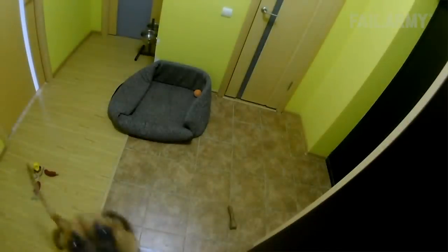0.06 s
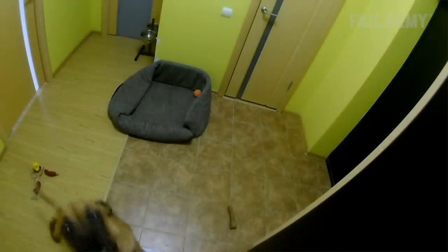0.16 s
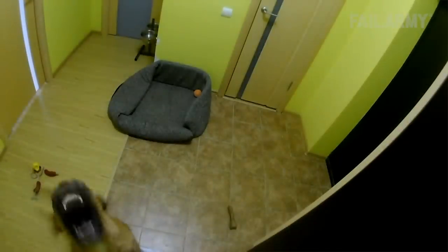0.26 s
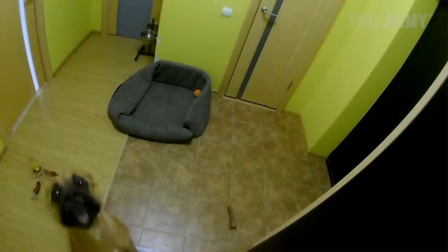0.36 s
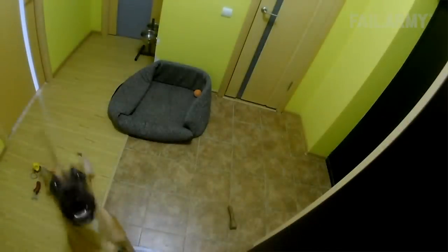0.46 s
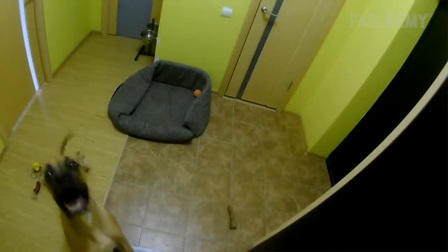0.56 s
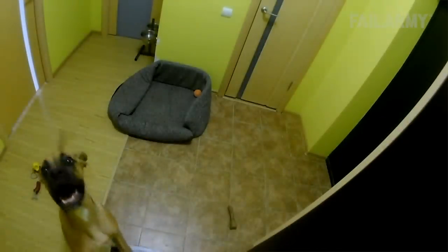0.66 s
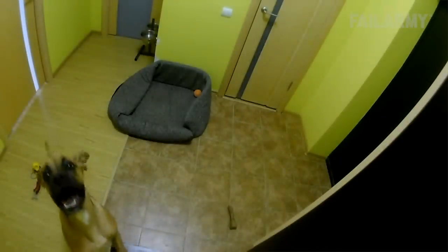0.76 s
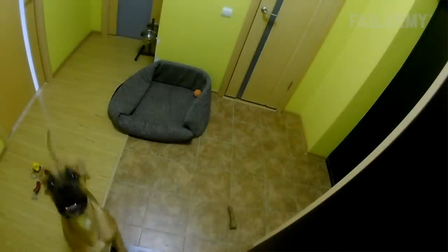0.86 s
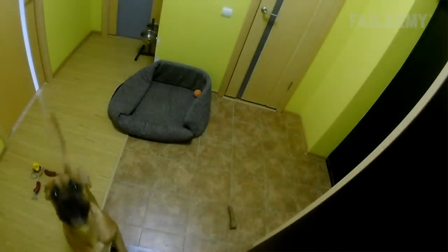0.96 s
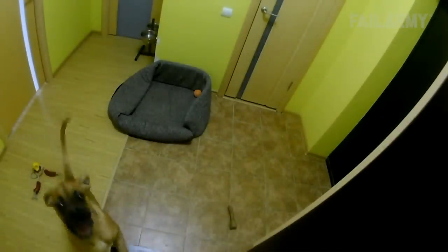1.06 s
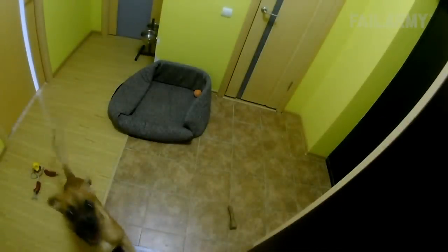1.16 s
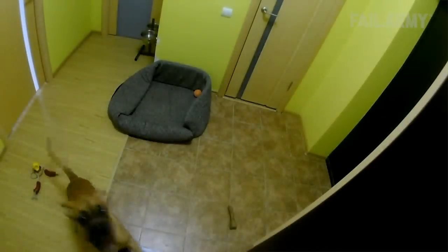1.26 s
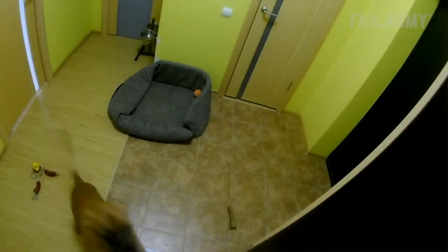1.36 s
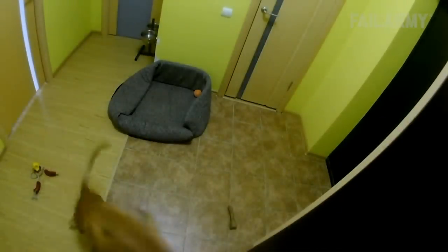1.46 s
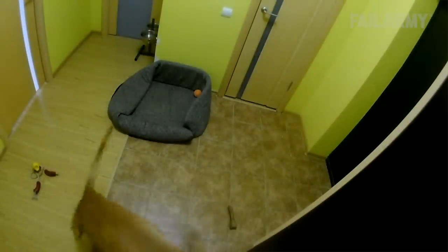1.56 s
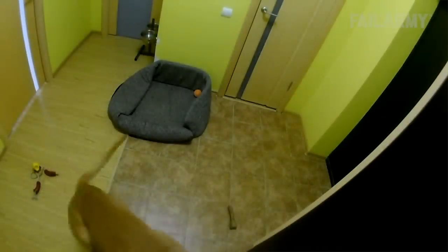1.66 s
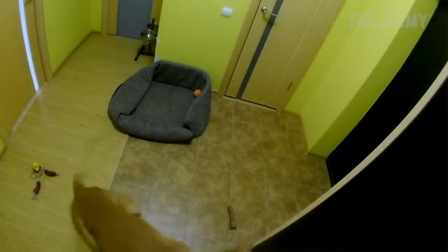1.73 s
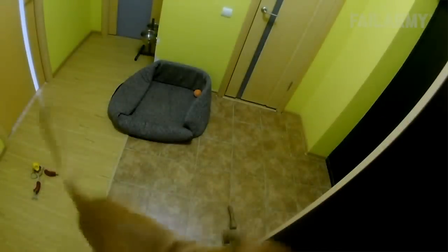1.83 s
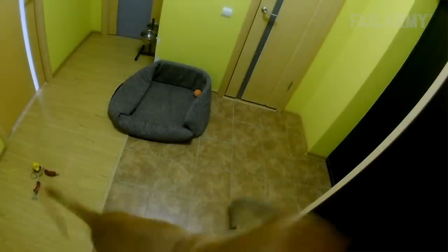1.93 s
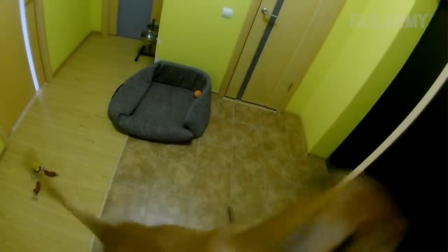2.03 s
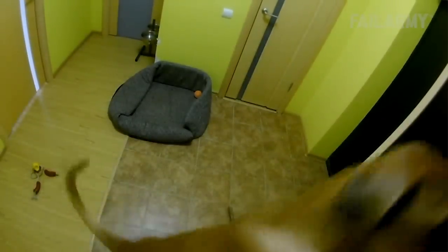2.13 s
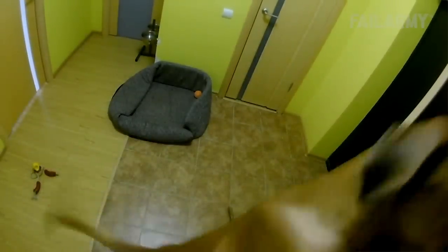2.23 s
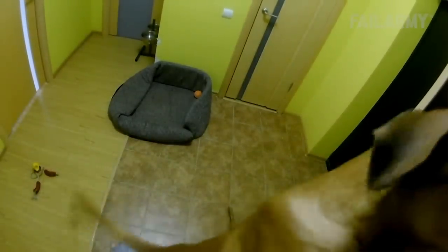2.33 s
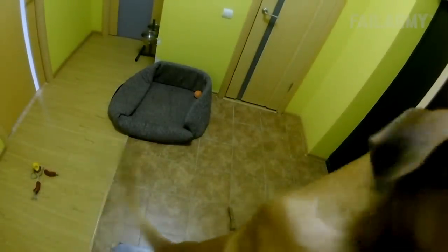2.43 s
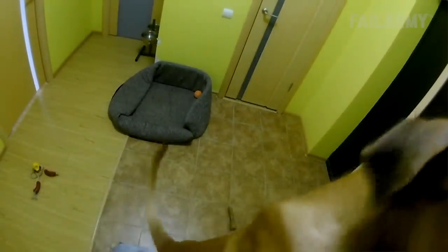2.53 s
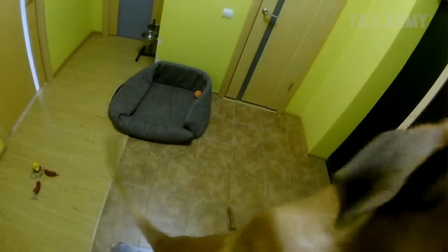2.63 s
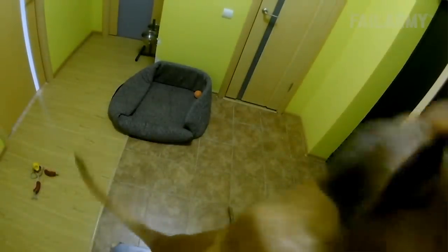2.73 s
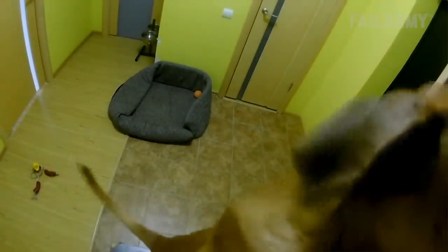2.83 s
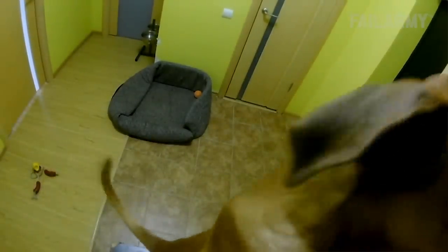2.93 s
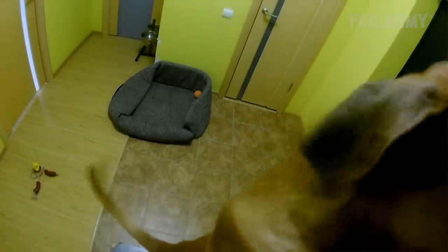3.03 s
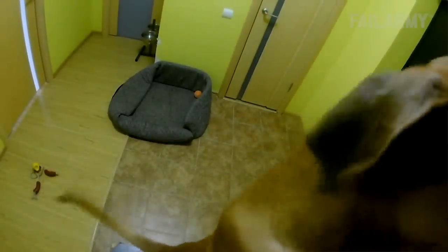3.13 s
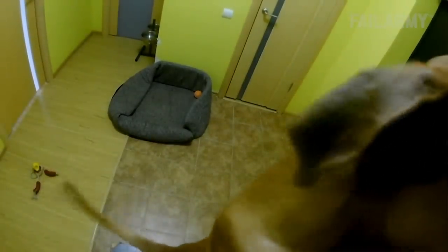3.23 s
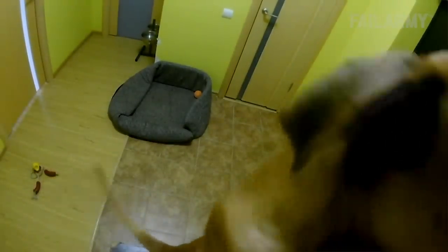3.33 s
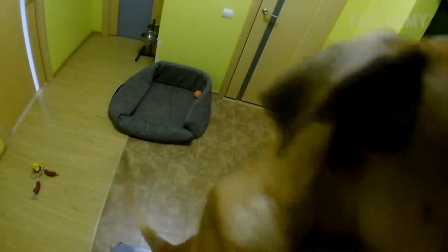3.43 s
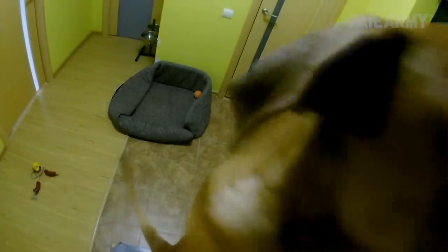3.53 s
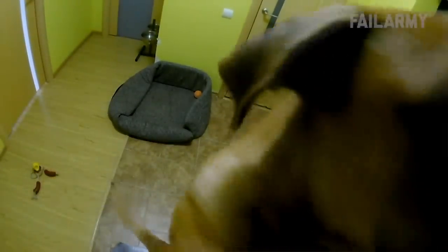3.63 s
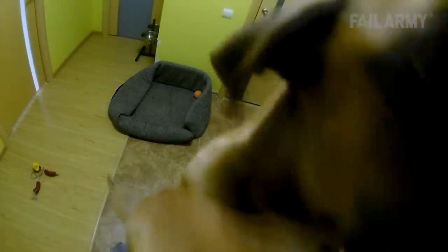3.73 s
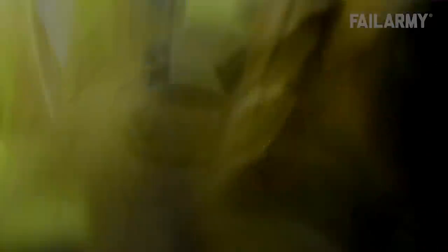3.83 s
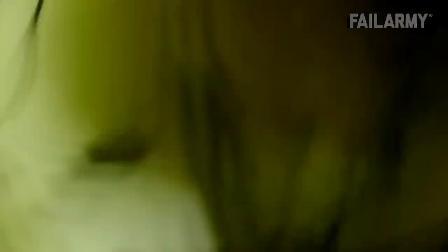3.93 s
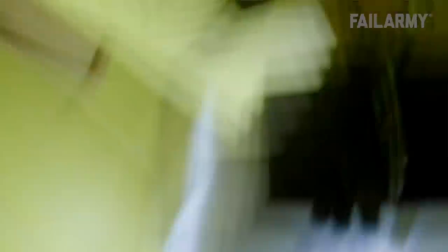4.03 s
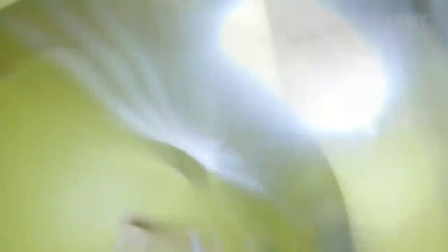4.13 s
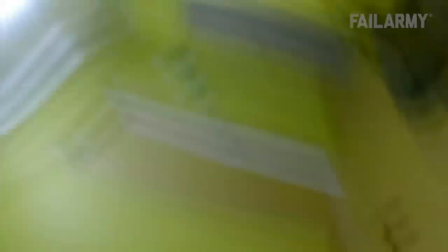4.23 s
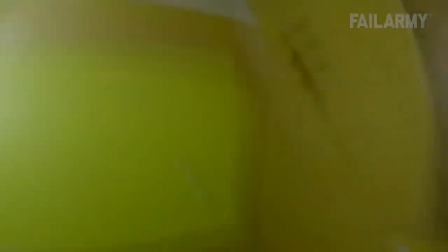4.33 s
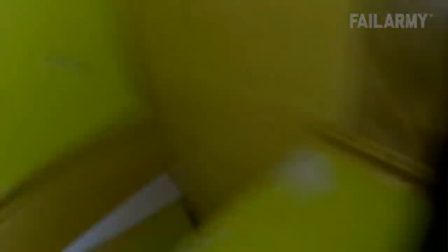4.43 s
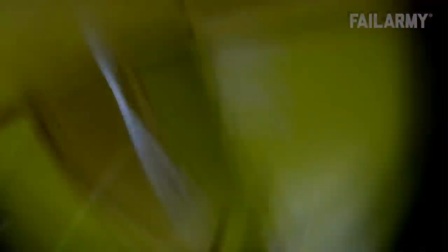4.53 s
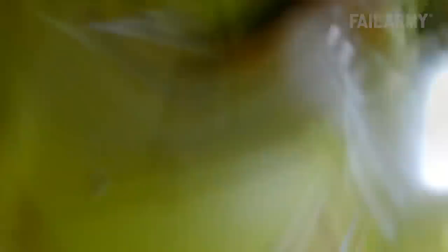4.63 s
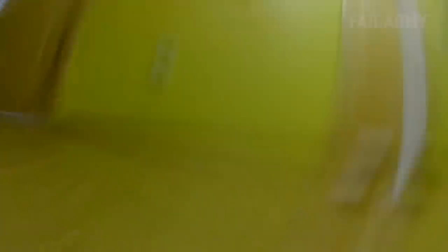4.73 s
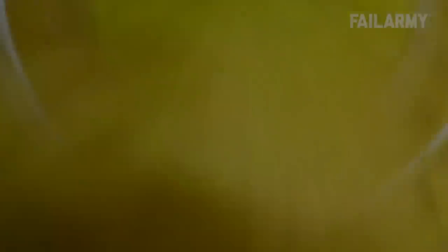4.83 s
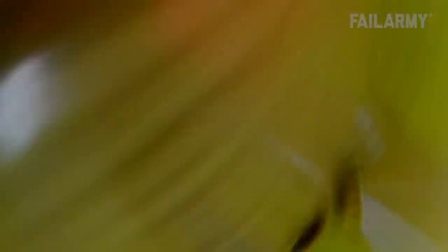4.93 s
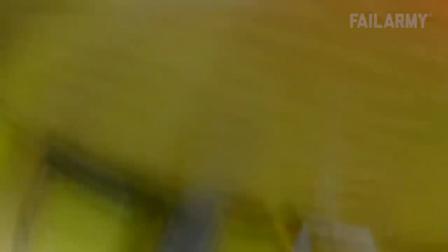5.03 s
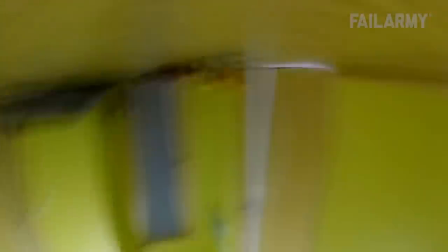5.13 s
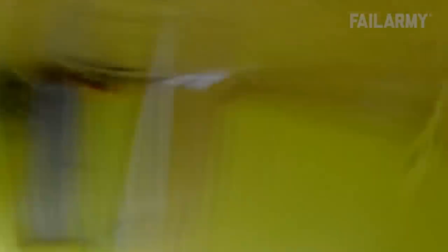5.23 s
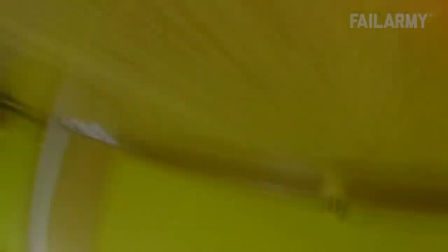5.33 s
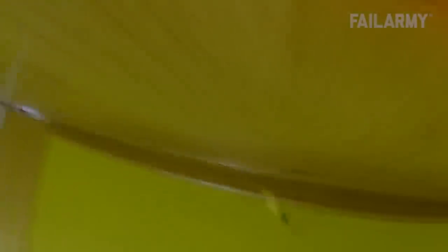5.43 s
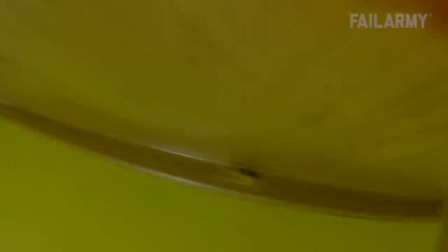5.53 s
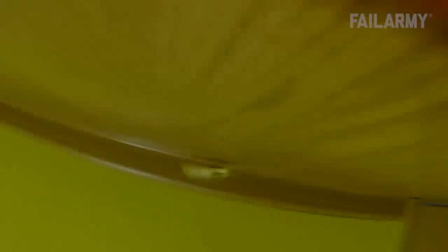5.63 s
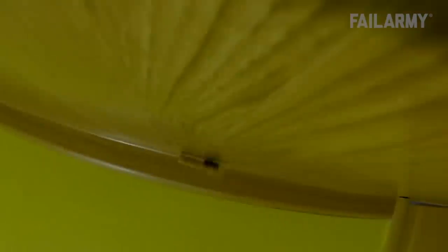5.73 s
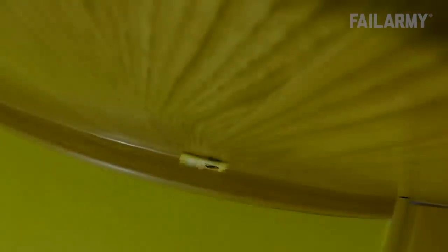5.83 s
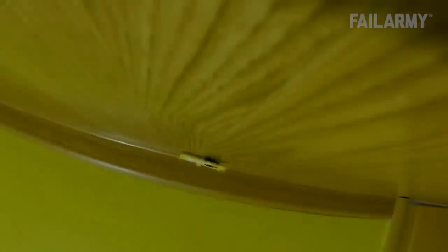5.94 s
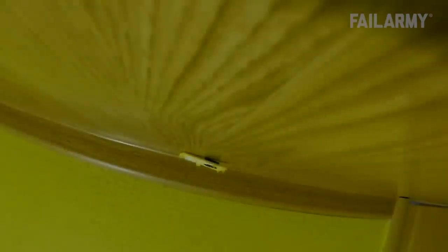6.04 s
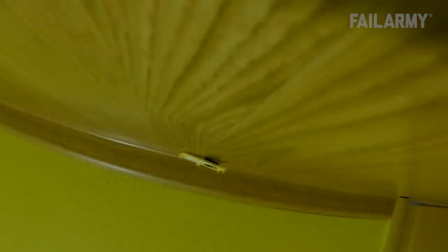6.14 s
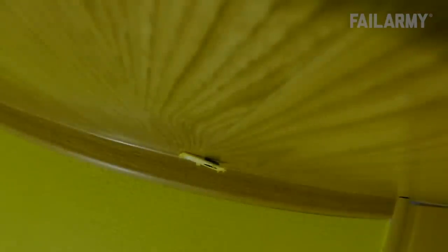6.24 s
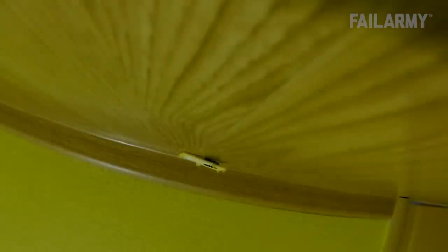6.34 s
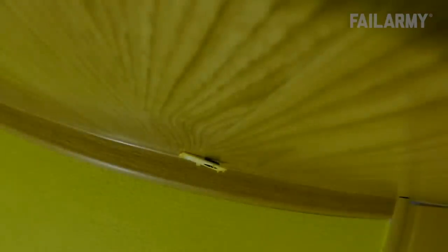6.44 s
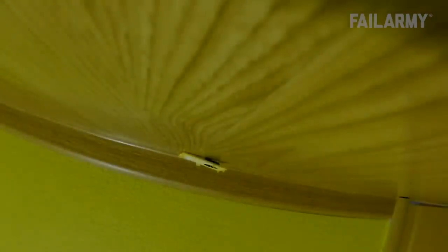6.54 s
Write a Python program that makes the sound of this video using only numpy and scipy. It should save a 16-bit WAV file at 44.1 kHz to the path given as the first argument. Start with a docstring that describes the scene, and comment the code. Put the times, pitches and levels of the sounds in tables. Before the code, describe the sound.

Three short, piercing yelps from a big dog, half a second apart, overload a small camera microphone and echo in a hard-walled hallway. Soft booming paw steps and claw ticks follow, then near quiet. Suddenly hard, distorted knocks hit the plastic housing, becoming a dense clatter and rattle, then a dull rumbling drag, near stillness and a last hoarse scrape.

```python
"""Three loud yelps of a big dog in a hard-walled hallway, close enough to overload a small camera's microphone.
Each yelp is a set of harmonics and breath under a moving mouth resonance.
The dog pads over, paws booming on boards and claws ticking, climbs up, knocks the camera off its shelf and
drags it clattering along: noise bursts, case modes and friction noise. Under it lie hall echoes and a hush."""
import sys
import numpy as np
from scipy import signal
from scipy.fft import rfft, irfft, next_fast_len
from scipy.io import wavfile
from scipy.ndimage import uniform_filter1d

SR = 44100
rng = np.random.default_rng(int(sys.argv[2]) if len(sys.argv) > 2 else 0)


def transcribe(signal):
    """Save signal, clipped to [-1, 1], as a 16-bit WAV file at the path in sys.argv[1]."""
    frames = np.atleast_2d(signal).T
    limited = np.clip(frames, -1, 1)
    pcm = np.round(limited * 32767).astype(np.int16)
    wavfile.write(sys.argv[1], SR, pcm)


def boost_factor(decibels):
    """Convert a level in decibels to a linear amplitude factor."""
    exponent = np.asarray(decibels, float) / 20
    return 10 ** exponent


N = 290605
T = np.arange(N) / SR  # time in seconds


def colour(x, points):
    """Causal filter by (Hz, dB) points: the phase comes from the folded cepstrum of the log gain."""
    hz, db = np.transpose(points)
    size = 2 * next_fast_len(len(x) // 2 + SR // 2)
    f = np.arange(size // 2 + 1) * SR / size + 1  # 1 Hz up, so that the logarithm exists
    gain = boost_factor(np.interp(np.log(f), np.log(hz), db))
    cepstrum = irfft(np.log(gain), size)
    cepstrum[1:size // 2] *= 2
    cepstrum[size // 2 + 1:] = 0
    response = np.exp(rfft(cepstrum))
    return irfft(rfft(x, size) * response, size)[:len(x)]


def coloured_noise(points):
    """Steady noise of rms 1 with the spectrum given by (Hz, dB) points."""
    return unit(colour(rng.standard_normal(N), points))


def unit(x):
    """Scale to rms 1."""
    return x / np.sqrt(np.mean(x ** 2))


def band(x, hz, width):
    """Two-pole resonance."""
    return signal.lfilter(*signal.iirpeak(min(hz, .4 * SR), hz / width, fs=SR), x)


def steep(x, hz, width):
    """The same resonance three times, for steeper sides."""
    return band(band(band(x, hz, width), hz, width), hz, width)


def walk(rate):
    """Random levels held 1 / rate s and slewed; spread near 1."""
    hold = int(SR / rate)
    levels = np.repeat(rng.standard_normal(N // hold + 1), hold)
    return 1.2 * uniform_filter1d(levels, hold)[:N]


def add(out, s, x):
    """Mix x into out from time s."""
    i = int(s * SR)
    out[i:i + len(x)] += x[:N - i]


def curves(tables):
    """Columns of several tables over time, at -90 dB between them."""
    rows = []
    for table in tables:
        first, last = table[0], table[-1]
        rows += [(first[0] - .02, -90, *first[2:]), *table, (last[0] + 0.0097, -90, *last[2:])]
    s, *columns = np.transpose(rows)
    return [np.interp(T, s, c) for c in columns]


def barks():
    """Vocal folds as harmonics under a mouth resonance; roughness shakes pitch, alternates cycles, adds breath."""
    # the yelps, one list each: time_s, pitch_hz, level_db, mouth_resonance_hz, roughness (0-1)
    yelps = [
        [(.201, 734, -30, 1250, 0.13), (.21, 780, -8, 1300, 0.2), (.22, 882, -8.5, 1320, 0.03),
         (.233, 869, 11, 1290, 0.54), (.237, 1128, 4.5, 1150, 0.2), (.253, 1195, 17.5, 1270, 0.11),
         (.2545, 465.4, 9, 1330, 0), (.268, 557.2, 4, 1620, 0.15), (.288, 590.7, 9.5, 1450, 0.11),
         (.312, 566.8, 13, 1560, 0), (.331, 429.2, 8.5, 1380, .15), (.372, 405.7, -16, 1230, .5)],
        [(.704, 171, -57, 1180, 0.62), (.724, 169.9, -31, 1100, 0.9), (.74, 197.8, -38.5, 930, 0.63),
         (.746, 597.5, -27, 800, 0.18), (.764, 610, -18.5, 1110, 0), (.776, 664, -15, 1250, 0.02),
         (.795, 647.5, -9.5, 1280, 0.05), (.808, 745.4, -10, 1450, 0.19), (.822, 775.7, -12.5, 1350, 0.25),
         (.834, 727, -25, 1300, .1)],
        [(1.247, 800, -26.5, 880, .2), (1.254, 779.5, 0, 910, 0.19), (1.264, 783.4, -1.5, 900, 0.15),
         (1.282, 833, 16, 920, 0.14), (1.286, 454.7, 11, 980, 0.18), (1.3, 522, 8, 1100, 0.18),
         (1.316, 517, 8, 1080, 0.3), (1.335, 483.8, -1.5, 1090, 0.11), (1.352, 505, 11, 1150, 0.47),
         (1.375, 500, -40, 1100, 0.27)],
    ]
    tilt_db, throat_db, half_db, breath_db = -10.5, -16.5, -15.5, -13  # tilt is per octave
    jitter = .12  # share of the pitch
    points = np.concatenate(yelps)
    hz, db, mouth, rough = (np.interp(T, points[:, 0], c) for c in points[:, 1:].T)
    # the resonance is 542 Hz wide at level 0 dB and narrows as the voice gets louder
    width = 542 * boost_factor(-0.39 * db)
    on = sum((T > b[0][0]) & (T < b[-1][0]) for b in yelps) > 0
    phase = 2 * np.pi * np.cumsum(hz * (1 + jitter * rough * walk(700))) / SR
    voice = np.zeros(N)
    for k in np.arange(1, 15) / 2:
        f = k * hz[on]
        tilt = boost_factor(tilt_db * np.log2(f / mouth[on]))
        shape = tilt / (1 + ((f - mouth[on] ** 2 / f) / width[on]) ** 2) ** 0.86
        shape = shape + boost_factor(throat_db) / (1 + ((f - 1980) / 250) ** 2)  # a fixed resonance of the throat
        # the short tract radiates a narrow range
        shape = shape / (1 + (f / 3000) ** 10) / (1 + (700 / f) ** 10)
        # strong and weak cycles in turn put lines between the harmonics
        share = 1 if k % 1 == 0 else boost_factor(half_db) * np.sqrt(np.clip(rough[on], 0, 1))
        voice[on] += share * shape * np.sin(k * phase[on])
    air_noise = coloured_noise([(300, -27), (700, -18.0), (1400, -4.5), (3100, -3.0), (3600, -23.0)])
    breath = boost_factor(breath_db) * np.clip(rough, 0, 1) * air_noise
    flutter = boost_factor(1.7 * rough * walk(220))
    return on * boost_factor(db) * (voice * flutter + breath)


def blows():
    """Each blow grinds for its contact time, some jolt the diaphragm; returns the case shock and the hall's share."""
    # blows on the camera housing: start_s, level_db, contact_pitch_hz, contact_ms, share_into_hall_db
    hits = [(3.815, -6, 940, 2.2, -9), (3.839, -11, 740, 10.5, -41.5), (3.859, -3, 960, 31.6, -8.5),
            (3.876, 6.5, 1270, 10, -11.5), (4.223, -33, 664, 2.4, -3), (4.247, -13, 926, 3.6, -29),
            (4.471, 1.5, 1290, 3.55, -15.5), (4.565, 13, 1325, 4.7, -17), (4.574, 11.5, 1600, 7.5, -6.5),
            (4.863, 4, 1320, 8.3, -13), (4.902, -0.5, 1130, 4.3, 3.5), (4.915, -9.5, 2300, 1.2, -24),
            (4.969, -0.5, 654, 7.4, -30), (5.009, -12.5, 550, 1.4, -30), (5.024, 3, 940, 6.5, -30),
            (5.071, 6.5, 1044, 2.9, -35), (5.09, -20.5, 1500, 3.9, -12), (5.118, -6.5, 900, 5.5, -30),
            (5.139, -0.5, 920, 1.16, -18), (5.166, -2.5, 1580, 1.3, 2), (5.176, -27, 800, 64, -17),
            (5.278, -12, 1160, 0.67, -22), (5.297, -16, 905, 5.9, -20), (5.317, -12.5, 2260, 1.4, -23),
            (5.324, -14, 1680, 1.7, 5), (5.342, -15, 1600, 0.74, -21), (5.349, -15, 930, 0.97, 6),
            (5.382, -14.5, 1570, 4.1, -28), (5.396, -16, 1340, 7.1, 13.5), (5.407, -13.5, 1270, 0.7, 7.5),
            (5.444, -17, 1500, 4, -17), (5.558, -19.5, 694, 2.1, -8), (5.568, -22, 2470, 2.7, 7.5)]
    # blows that also shove the whole camera and jolt the diaphragm: start_s, level_db
    shoves = [(3.816, -12.5), (3.86, -13.5), (3.878, -10.5), (4.248, -12.5), (4.472, -20), (4.566, -12.5),
              (4.862, -7.5), (4.904, -19), (4.968, -20.5), (5.071, -21), (5.118, -24)]
    ring_db, crack_db, fade_s = -44.5, -10.0, 0.0013
    jolt_hz, jolt_fade_s = 70.4, .006
    case, jolts, air = np.zeros((3, N))
    t = T[:int(.1 * SR)]
    noises = rng.standard_normal((len(hits), 2, len(t)))
    for (s, db, hz, ms, room_db), noise in zip(hits, noises):
        grind = np.exp(-np.clip(t - ms / 1000, 0, None) / fade_s)
        grind = grind * (1 + 2.23 * np.exp(-t / 0.00052))  # the first touch is the hardest
        thud = steep(noise[0] * grind, hz, 1.97 * hz) / np.sqrt(hz / 22000)
        crack = band(band(noise[1] * grind ** 2, 4640, 4700), 4120, 5300)
        # harder blows crack more
        hit = boost_factor(db) * (thud + boost_factor(crack_db + 0.9 * db) * crack)
        add(case, s, hit)
        add(air, s, boost_factor(room_db) * hit)
    for s, db in shoves:
        add(jolts, s, boost_factor(db) * np.sin(2 * np.pi * jolt_hz * t) * np.exp(-t / jolt_fade_s))
    shock = case + jolts + boost_factor(ring_db) * housing(case)
    return shock, colour(air, [(100, 7.0), (1000, -25), (3000, -16.5), (7000, -19.0), (12000, -26.0)])


def housing(x):
    """The plastic case rings: each of its modes is a sine that dies away."""
    # what the housing rings with: pitch_hz, level_db, t60_s (time to fall 60 dB)
    modes = [(300, -14, 0.039), (566, 0.5, 0.029), (620, -18.5, 0.18), (800, -1.5, 0.025),
             (1500, -17, 0.11), (2300, -9.5, 0.014)]
    t = T[:int(.4 * SR)]
    ring = sum(boost_factor(db - 60 * t / t60) * np.sin(2 * np.pi * hz * t) for hz, db, t60 in modes)
    return signal.fftconvolve(x, ring)[:N]


def rattle():
    """Uneven small clicks of the case skipping along the shelf."""
    # how strongly the housing rattles: time_s, level_db
    strength = [(4.9, -43), (5.15, -18.5), (5.2, -25), (5.3, -23.5), (5.42, -21), (5.6, -31), (5.9, -43.5)]
    rate, spread_db = 100.0, 4.5  # average clicks per second; spread per natural-log unit of chance
    ring_db, edge_db = -34.0, -9.0
    chance = rng.random((2, N))
    extra_db = -spread_db * np.log(np.maximum(chance[1], 1 / 12))
    clicks = (chance[0] < rate / SR) * boost_factor(curves([strength])[0] + extra_db)
    burst = signal.lfilter([1], [1, -.975], clicks) * rng.standard_normal(N)
    body = 4.1 * (steep(burst, 1400, 3100) + boost_factor(edge_db) * steep(burst, 4300, 3800))
    return body + boost_factor(ring_db) * housing(body)


def thumps():
    """Each step sets the boards booming at the pitch of that spot; dragging keeps them rumbling."""
    # paws and camera landing on boards and shelf: start_s, level_db, boom_pitch_hz
    steps = [(1.598, -35, 124.9), (1.826, -38.5, 120.6), (1.897, -29.5, 108.7), (1.922, -26, 133.3),
             (1.985, -22, 210.4), (2.029, -24, 185), (2.095, -31, 184), (2.122, -29.5, 120),
             (2.24, -39, 117), (2.447, -38.5, 214.4), (2.499, -42, 112.4), (2.987, -50, 96.4),
             (3.131, -43, 106), (3.168, -45, 114), (3.82, -16, 258), (3.881, -23.5, 147),
             (3.95, -33.5, 200), (4.041, -39, 220), (4.409, -43, 300), (5.849, -34, 99), (5.9, -37, 139),
             (5.99, -34.5, 139), (6.037, -40, 136.4), (6.215, -46, 136)]
    # the case dragged over boards: time_s, level_db, boom_pitch_hz
    drag = [(5.66, -45.5, 200.3), (5.71, -29, 180.1), (5.82, -26, 134.1), (5.86, -43.5, 139),
            (6.15, -53.5, 140.9)]
    boom_cycles = 40  # cycles in which a board's boom falls by 60 dB
    drag_db, drag_hz = curves([drag])
    push = coloured_noise([(1, 3.5), (30, -9.0), (90, -8.0), (300, -16), (20000, -83)])
    rumble = boost_factor(drag_db) * push * np.sin(2 * np.pi * np.cumsum(drag_hz) / SR)
    out = colour(rumble, [(25, -18.5), (70, 0)])
    t = T[:int(.3 * SR)]
    for (s, db, hz), noise in zip(steps, rng.standard_normal((len(steps), len(t)))):
        # neighbouring board modes blur the boom
        blur = unit(band(band(noise, 1.5 * hz, 1.4 * hz), 1.5 * hz, 1.4 * hz))
        boom = np.sin(2 * np.pi * hz * t) + .5 * blur
        soft_start = 1 - np.exp(-t / 0.0013)  # a soft pad pushes for some milliseconds
        add(out, s, boost_factor(db - 60 * t * hz / boom_cycles) * soft_start * boom)
    return out


def claws():
    """Short noise ticks, each with a ring of its own pitch."""
    # claws on the floor and shelf: start_s, level_db, pitch_hz
    ticks = [(1.931, -29.5, 1066), (2.033, -21, 1130), (2.087, -24, 1760), (2.201, -18.5, 1040),
             (2.396, -34.5, 1680), (2.475, -31, 1240), (2.534, -29, 1240), (2.803, -41.5, 1290),
             (2.834, -40.5, 1010), (2.901, -43, 1500), (3.023, -43, 1790), (3.042, -36.5, 1306),
             (3.233, -30, 1730), (3.341, -35.5, 1270), (4.281, -52.5, 1336), (4.404, -44, 950),
             (5.619, -33, 1164), (5.651, -45, 2410), (5.716, -31, 920), (5.787, -39, 2540),
             (5.885, -35, 3000), (6.214, -35, 690)]
    t60_s = .05
    out, t = np.zeros(N), T[:int(.1 * SR)]
    for (s, db, hz), noise in zip(ticks, rng.standard_normal((len(ticks), len(t)))):
        tick = steep(noise * boost_factor(-60 * t / t60_s), 0.95 * hz, 1.39 * hz)
        add(out, s, boost_factor(db) * tick / np.sqrt(hz / 15000))
    return out


def rubbing():
    """Grainy friction noise: dull for fur, pads and housing, narrower and brighter for sliding claws."""
    # fur, paws and housing rubbing, one list per stretch: time_s, level_db
    rubs = [
        [(1.95, -55), (2.058, -43), (2.7, -61.5)],
        [(4.2, -49.5), (4.3, -51), (4.46, -56)],
        [(5.2, -37), (5.57, -32), (5.71, -38.5), (6.19, -48.5), (6.24, -46), (6.4, -61.5), (6.5, -63)],
    ]
    # spectrum of that rubbing: frequency_hz, level_db (per Hz)
    rub_spectrum = [(180, -13), (300, -6.5), (534, -9.5), (588, -5), (1320, -13.5), (2170, -14),
                    (5520, -34), (8000, -46), (10400, -80), (17600, -120)]
    # claws sliding: time_s, level_db
    scuffs = [
        [(2.75, -59), (2.86, -56.5), (2.885, -45), (2.918, -42), (2.93, -67.5), (3.668, -54), (3.78, -62)],
    ]
    # spectrum of the sliding claws: frequency_hz, level_db (per Hz)
    scuff_spectrum = [(240, -74.5), (400, -23), (782, -2.5), (882, -8), (1810, 5), (2090, -6),
                      (7000, -52.5), (9100, -86), (15400, -120)]
    dull = boost_factor(curves(rubs)[0] + 4.0 * walk(45)) * coloured_noise(rub_spectrum)
    bright = boost_factor(curves(scuffs)[0] + 2.5 * walk(150)) * coloured_noise(scuff_spectrum)
    return dull + bright


def shove():
    """A hollow, hoarse scrape at the end: rough noise in a few resonances."""
    # resonances of the scrape: pitch_hz, width_hz (doubled in each filter pass), level_db
    resonances = [(280, 340, -34), (500, 120, -41), (1270, 150, -35.5), (1600, 260, -38)]
    start_s, rise_s = 6.532, 0.00083
    rough = rng.standard_normal(N) * boost_factor(0.66 * walk(152.2)) * np.clip((T - start_s) / rise_s, 0, 1)
    return sum(boost_factor(db) * steep(rough, hz, 2 * width) * np.sqrt(SR / 2 / width) for hz, width, db in resonances)


def panel(air):
    """A wooden panel nearby that the blows set humming: one long mode."""
    hz, db, t60_s = 415, -42, 0.6
    t = T[:SR]
    return signal.fftconvolve(air, boost_factor(db - 60 * t / t60_s) * np.sin(2 * np.pi * hz * t))[:N]


def hall(x):
    """Dense echoes that build up, then die at each band's own rate; the echo pattern has unit energy."""
    # how long the hallway rings: frequency_hz, t60_s (time to fall 60 dB)
    decay = [(100, 0.66), (300, 0.94), (1000, 0.68), (2500, 0.98), (5000, 0.42), (10000, 0.18)]
    build_s = 0.0059
    decay_hz, decay_s = np.transpose(decay)
    t, tail = T[:int(1.5 * SR)], 0
    for hz in 63 * 2 ** np.arange(0, 8, .5):
        t60 = np.interp(np.log(hz), np.log(decay_hz), decay_s)
        tail = tail + band(rng.standard_normal(len(t)), hz, hz / 2) * boost_factor(-60 * t / t60) / np.sqrt(t60)
    tail = tail * (1 - np.exp(-(t / build_s) ** 2))
    return signal.fftconvolve(x, tail / np.sqrt(np.sum(tail ** 2)))[:N]


def earlier_echo():
    """Echo of a bark given just before the start: coloured noise that dies away."""
    # spectrum of the echo: frequency_hz, level_db (per Hz)
    echo_spectrum = [(120, -26), (200, -37), (497, -26.5), (607, -11), (904, 1.5), (1270, 1), (1670, -14),
                     (1890, -11), (2630, -18), (6000, -76.5), (7800, -110), (13200, -120)]
    start_db, t60_s = -29.5, 0.87
    return boost_factor(start_db - 60 * T / t60_s) * coloured_noise(echo_spectrum)


def hush():
    """Quiet background noise whose level wanders a little."""
    # spectrum of the hush: frequency_hz, level_db (per Hz)
    hush_spectrum = [(15, -46), (25, 0), (291, 1), (665, -1.5), (930, 1), (1110, -5.5), (1640, -7),
                     (2360, -9), (3950, -16), (12000, -60), (15600, -69.5), (22000, -120)]
    middle_db = -55.5
    return boost_factor(middle_db + 2.2 * walk(5)) * coloured_noise(hush_spectrum)


def scene():
    """Direct sounds and case shocks, with hall echoes of all but the thumps, panel and background."""
    voice = barks()
    case, air = blows()
    paws = claws() + rubbing() + shove()
    clatter = rattle()
    echo = hall(boost_factor(-7.5) * voice + air + boost_factor(-11.0) * paws + boost_factor(-13.0) * clatter)
    direct = voice + case + paws + clatter + thumps()
    return (direct + echo + panel(air) + earlier_echo() + hush())[None]


def roll_off(x):
    """The treble ends steeply here."""
    return signal.sosfilt(signal.butter(12, 16510, fs=SR, output="sos"), x)


def record(dry):
    """The input clips hard off centre; a capacitor tilts the flat tops; the converter hisses and filters."""
    # converter and case after the overload, with a dip near 8 kHz and the top cut: frequency_hz, gain_db
    response = [(20, -2.5), (60, 2), (200, 1.5), (3000, -4.5), (5500, -4.5), (7000, -8), (8100, -18),
                (9200, -8), (11500, -6), (13300, -14), (14500, -13), (15700, -26.5), (16500, -105)]
    ceiling, knee, offset = 0.43, 12, 0.07  # the offset is a share of the ceiling
    hiss_db, coupling_hz = -80, 44.0
    x = dry[0] / ceiling + offset
    clipped = ceiling * x / (1 + np.abs(x) ** knee) ** (1 / knee)
    clipped = clipped + boost_factor(hiss_db) * rng.standard_normal(N)
    pole = np.exp(-2 * np.pi * coupling_hz / SR)
    coupled = signal.lfilter([1, -1], [1, -pole], clipped - clipped[0])
    mix = colour(coupled, response)[None]
    return roll_off(mix)


dry = scene()
out = record(dry)
transcribe(out)
```